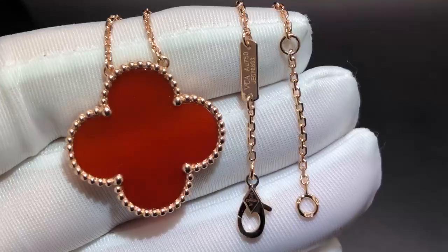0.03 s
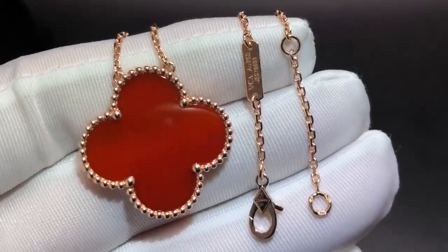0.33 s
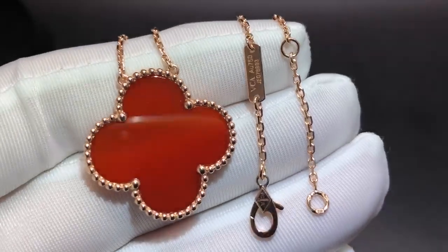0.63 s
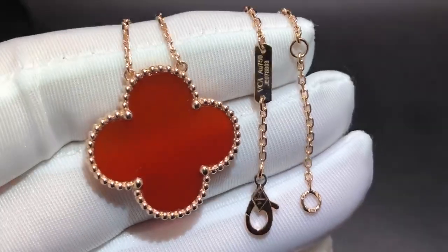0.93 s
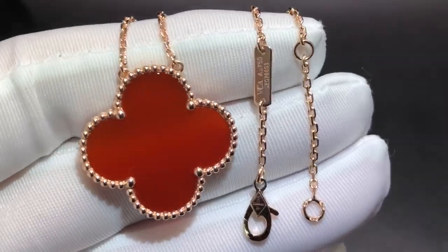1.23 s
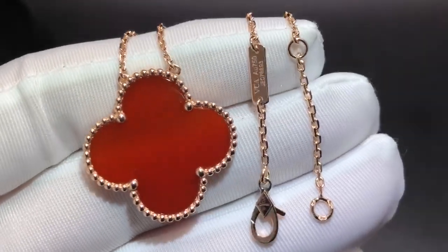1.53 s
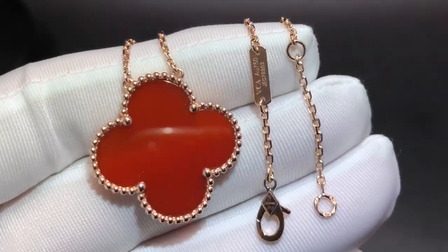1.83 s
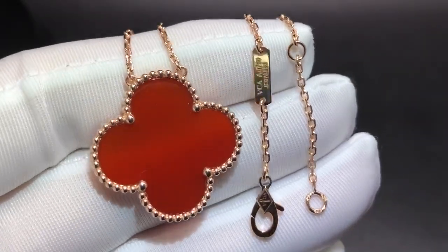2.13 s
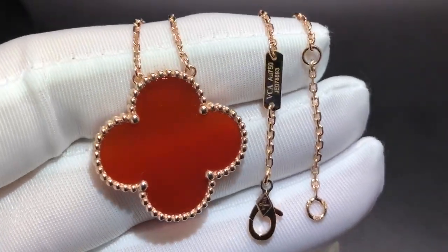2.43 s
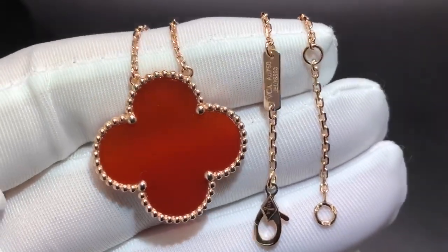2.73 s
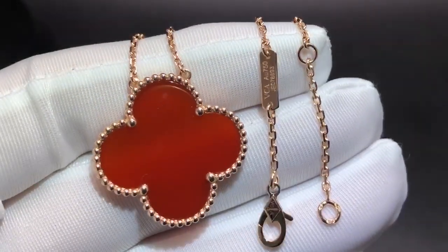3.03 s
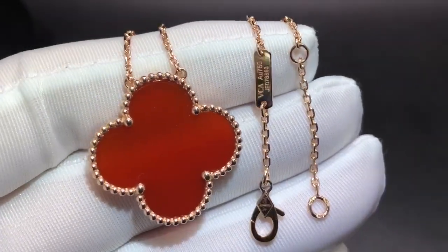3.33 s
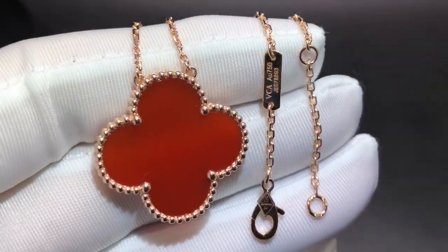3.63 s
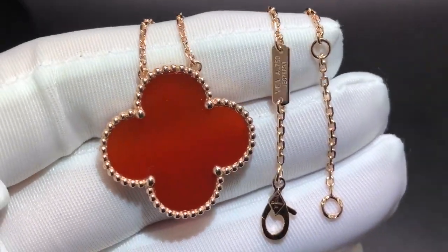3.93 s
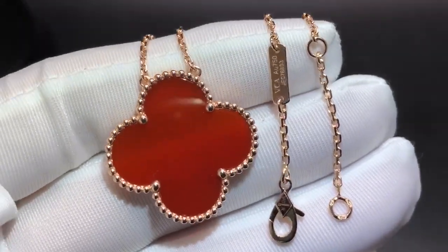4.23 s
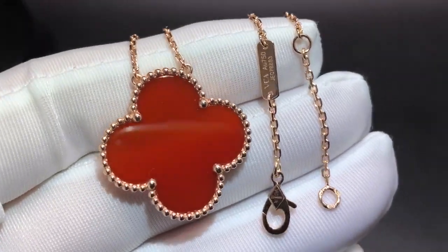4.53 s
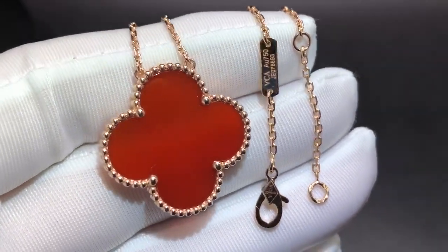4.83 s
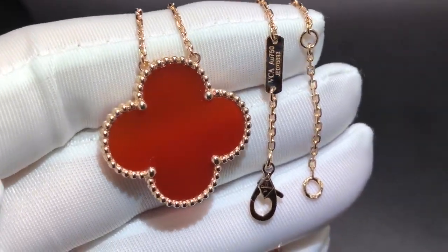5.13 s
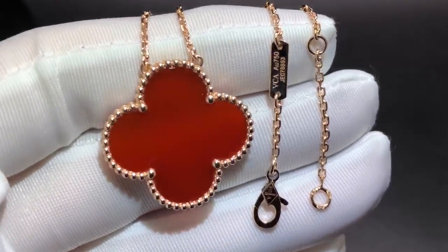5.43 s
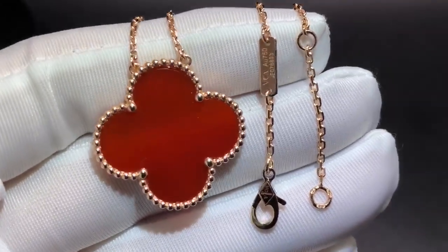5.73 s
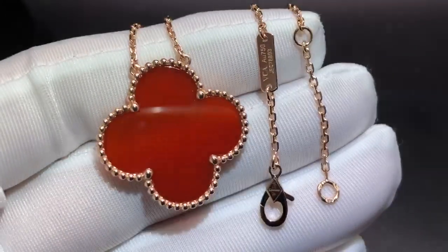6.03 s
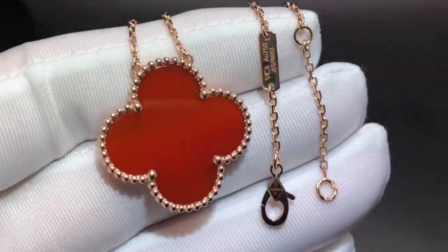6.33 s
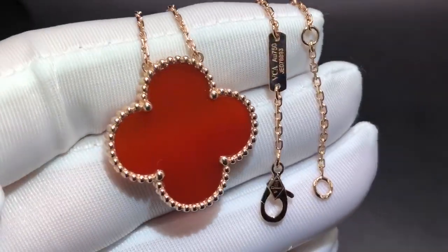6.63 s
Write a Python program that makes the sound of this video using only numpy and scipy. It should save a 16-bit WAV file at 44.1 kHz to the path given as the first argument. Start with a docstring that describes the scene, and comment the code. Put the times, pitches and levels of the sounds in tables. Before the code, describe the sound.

A low ventilation rumble with soft hiss runs throughout in a small workroom. Machines hum on steady notes, two fans beat about twice a second, and faint thin whistles come and go. From about 0.1 to 0.5 seconds there is a short, high, slightly raspy friction squeal. A small electric motor then runs up, barely audible at first, with a fine rising treble buzz and a light rush of air growing gradually. From about 3.8 seconds its high whine swells in quick, uneven throbs, strongest between 4.5 and 5.5 seconds, then easing toward the end at about 6.7 seconds while the buzz continues. Close by, a gloved hand brushes softly twice, at about 4.2 and 5 seconds. Everything is fairly quiet, with the low rumble and hum remaining the main sound.

```python
"""Small workroom. Ventilation rumbles and hisses, machines hum on steady notes, two fans beat at 2 Hz.
A gloved hand brushes softly twice, close by. After a short friction squeal a small electric motor
runs up: its slot whine swells and throbs through the casing resonance, while a fine treble buzz
and the rush of rotor air grow with speed."""
import sys
import numpy as np
from scipy import signal
from scipy.fft import rfft, irfft, next_fast_len
from scipy.io import wavfile
from scipy.ndimage import uniform_filter1d

SR = 44100
rng = np.random.default_rng(int(sys.argv[2]) if len(sys.argv) > 2 else 0)


def unload_wav(signal):
    """Save mono or channel-first audio to the path in sys.argv[1] as 16-bit WAV at rate SR, clipped to [-1, 1]."""
    wavfile.write(
        sys.argv[1],
        SR,
        np.round(np.clip(np.atleast_2d(signal).T, -1, 1) * 32767).astype(np.int16),
    )


N = 295470
TIME = np.arange(N) / SR

# ventilation rumble with room modes, air hiss, top hiss: (frequency [Hz], density [dB/Hz])
RUMBLE = [(25, -92), (38, -83), (45, -77), (58, -60), (72, -77), (83, -61.5), (95, -71.5), (120, -59),
          (135, -67), (150, -59.5), (175, -63), (220, -65.5), (300, -76), (400, -86.5), (520, -110)]
AIR_HISS = [(300, -100), (420, -83.5), (580, -84.5), (700, -86), (950, -88), (1120, -94), (1300, -93),
            (1700, -97.5), (2400, -98), (2800, -97), (3050, -102), (3800, -102), (4700, -106), (6500, -125)]
TOP_HISS = [(3500, -125), (5200, -110), (6200, -109), (6750, -105), (7300, -111), (9700, -107),
            (11200, -111), (13500, -107)]
# brief swells and lulls of the 72-136 Hz rumble: (time [s], gain [dB])
LOW_RUMBLE_LEVEL = [(.17, -2), (.42, 7.5), (1.26, -8), (1.37, 6), (1.66, 2.5), (2.22, 2.5), (2.63, 3),
                    (2.95, -3), (3.84, -2), (3.98, 4), (4.28, 4.5), (4.68, 3), (4.8, 5.5), (5.38, -2),
                    (5.8, -4), (6.26, -10), (6.51, 3)]
# slow rise and fall of the top hiss and the fans: (time [s], gain [dB])
TOP_SWELL = [(.1, -2.5), (.42, -1), (.55, 1), (2.1, -3), (6.7, -10.5)]
FAN_SWELL = [(0, 2), (.8, 7), (1.2, 2.5), (1.7, -1), (2.2, 1), (2.7, 2), (3.2, -0.5), (3.7, 0.5),
             (4.2, -1.5), (4.7, -1.5), (5.1, 0.5), (5.7, 6), (6.2, 3.5), (6.6, -1)]
# machine and fan notes: (frequency [Hz], level [dB])
HUM_NOTES = [(49, -53), (99.9, -53), (111.4, -49.5), (198, -56.5), (231.8, -49.5), (299.8, -59),
             (333.2, -59), (347.8, -59.5), (380.7, -73.5), (428.4, -64.5), (476, -74), (523.6, -82),
             (579.6, -64.5), (666.3, -70), (713.9, -72), (761.5, -73), (896.8, -65.5), (981.1, -67),
             (1000, -76), (1056, -79.5), (1094.7, -75.5), (1141, -85), (1190, -79.5), (1380.2, -76.5),
             (2379.7, -78), (2427.2, -89), (2474.8, -90), (2808, -77.5), (2855.6, -82), (3759.9, -80),
             (3807.5, -91), (4664, -88), (4711.8, -84), (6702, -87.5)]
FAN_NOTES = [(146.87, -47), (148.89, -45.5)]
# thin machine notes: (time [s], level [dB])
HIGH_WHISTLE = [(.1, -76), (1.4, -75), (2.2, -78), (2.6, -79), (4.6, -80.5), (5.4, -77.5), (5.7, -72),
                (6.0, -82)]
LOW_WHISTLE = [(1.2, -83), (1.7, -68.5), (3.2, -69), (3.6, -88), (4.4, -65.5), (6.5, -77)]
# glove strokes: (time [s], half length [s], level [dB])
BRUSHES = [(4.19, 0.095, -67), (5.05, 0.13, -65.5)]
# cloth spectrum: (frequency [Hz], relative density [dB])
CLOTH = [(1200, -8), (2500, -5), (3400, 11), (4300, 7), (5500, 2), (10000, -35)]
# friction squeal: (time [s], pitch [Hz], level [dB])
SQUEAL = [(.03, 2670, -77), (.09, 2670, -70), (.115, 2670, -63), (.205, 2700, -57), (.24, 2725, -65),
          (.28, 2755, -58.5), (.305, 2735, -65), (.425, 2720, -64.5), (.45, 2720, -79), (.7, 2720, -130)]
# rotor air at full speed: (frequency [Hz], density [dB/Hz])
ROTOR_AIR = [(300, -100), (580, -88), (700, -89), (900, -83.5), (1020, -88), (1120, -100), (1350, -95),
             (2100, -104), (3500, -104), (4600, -104), (6000, -106), (9000, -116)]
# reflections off nearby surfaces: (delay [s])
ECHOES_S = [.01039, .02218, .04162, .04651, .07525]
# buzz envelope: (frequency [Hz], level per harmonic [dB])
BUZZ = [(4500, -101), (5600, -88), (6600, -84.5), (7600, -85), (9500, -81.5), (11000, -83.5),
        (14000, -81.3)]
# strong and weak harmonic groups: (harmonic number, gain [dB])
BUZZ_GROUPS = [(20, 0), (28, 1.5), (30, -2), (33, 3), (38, 1), (43, -2), (46, 2.5), (51, -3), (55, 1.5),
               (58, -1), (61, 3), (66, -4), (72, 3), (77, -1), (82, 3), (90, -1)]
# whine surges: (time [s], level [dB], lean [-1 lower to 1 upper side tone])
THROBS = [(3.853, -69, 0), (3.931, -67.5, 0), (4.151, -65, .5), (4.258, -69, .4), (4.353, -61, .9),
          (4.441, -67, 1), (4.486, -56, .3), (4.586, -62, .4), (4.667, -55, .45), (4.776, -58, .25),
          (4.836, -56.5, .1), (4.93, -54.5, .1), (5.02, -54.5, -.25), (5.15, -55.5, 0), (5.21, -63, -.5),
          (5.305, -57, -.3), (5.352, -59, -.2), (5.433, -57, -.8), (5.526, -62, -.25), (5.581, -62, -.5),
          (5.631, -63, -.6), (5.776, -60, -.2), (5.83, -66, -.4), (5.945, -68, -.4), (6.029, -63, -.5),
          (6.158, -66.5, -.4), (6.382, -64.5, -.8), (6.512, -67, -.3), (6.66, -69, -.6)]
# casing resonances crossed by the whine's octave: (frequency [Hz])
OCTAVE_PEAKS_HZ = [4640, 5290]


def from_db(db):
    """Decibels to gain."""
    return 10 ** (np.asarray(db) / 20)


def rms_one(x):
    """Scale to unit power."""
    return x / np.sqrt(np.mean(x ** 2) + 1e-20)


def evened(x, span_s):
    """Hold unit power over span_s; faster flutter stays."""
    size = int(span_s * SR)
    return x / np.sqrt(uniform_filter1d(uniform_filter1d(x ** 2, size), size) + 1e-20)


def in_time(rows):
    """Table columns at every sample."""
    times_s, *columns = np.transpose(rows)
    return [np.interp(TIME, times_s, column) for column in columns]


def at_hz(spectrum, hz):
    """Spectrum level, interpolated over log frequency."""
    points_hz, db = np.transpose(spectrum)
    return np.interp(np.log(np.maximum(hz, 1)), np.log(points_hz), db)


def drift(rate_hz):
    """Smooth random motion, unit rms."""
    hop, settle = 40, 2000
    pole = np.exp(-2 * np.pi * hop * rate_hz / SR)
    white = rng.standard_normal(N // hop + settle + 2)
    slow = signal.lfilter([1], [1, -2 * pole, pole * pole], white)[settle:]
    return np.interp(np.arange(N) / hop, np.arange(len(slow)), rms_one(slow))


def noise(spectrum):
    """Noise of given density, rolling off above the last point."""
    size = next_fast_len(N)
    hz = np.arange(size // 2 + 1) * SR / size
    gain = from_db(at_hz(spectrum, hz)) / np.maximum(hz / spectrum[-1][0], 1) ** 2
    return irfft(rfft(rng.standard_normal(size)) * gain, size)[:N] * np.sqrt(SR / 2)


def tone(hz):
    """Unit-power sine on a pitch curve."""
    return np.sqrt(2) * np.sin(2 * np.pi * (np.cumsum(hz) / SR + rng.random()))


def ventilation(flutter_db=1.0):
    """Moving air: rumble plus fluttering hiss."""
    swell_db, = in_time(TOP_SWELL)
    hiss = noise(AIR_HISS) + from_db(swell_db) * noise(TOP_HISS)
    return noise(RUMBLE) + from_db(flutter_db * drift(20)) * hiss


def vary_low_rumble(x, band_hz=(72, 136), level_db=-44, half_s=.052):
    """The low band holds its level between brief swells and lulls."""
    band = signal.sosfiltfilt(signal.butter(3, band_hz, "band", fs=SR, output="sos"), x)
    change_db = sum(db * np.exp(-((TIME - at_s) / half_s) ** 2) for at_s, db in LOW_RUMBLE_LEVEL)
    return x - band + from_db(level_db + change_db) * evened(band, span_s=.2)


def machine_hum(waver_db=1.14, wander_share=.000502):
    """Running machines: each note wavers slightly in level and pitch."""
    return sum(from_db(db + waver_db * drift(2.9)) * tone(hz * (1 + wander_share * drift(2.74)))
               for hz, db in HUM_NOTES)


def machine_whistles(high_hz=3855, low_hz=809.4, flicker_db=2.0, jitter_hz=5):
    """Two thin, unsteady machine notes come and go."""
    high_db, = in_time(HIGH_WHISTLE)
    low_db, = in_time(LOW_WHISTLE)
    high = from_db(high_db + flicker_db * drift(5.6)) * tone(high_hz + jitter_hz * drift(28))
    return high + from_db(low_db) * tone(low_hz + drift(2.6))


def fans(trim_db=-4.0, waver_db=1.06, wander_hz=.7, first_beat_s=.22):
    """Two close fan notes beat; they waver apart in level and wander together in pitch."""
    swell_db, = in_time(FAN_SWELL)
    wander_cycles = np.cumsum(wander_hz * drift(1.82)) / SR + rng.random()
    notes = 0
    for hz, db in FAN_NOTES:
        cycles = hz * (TIME - first_beat_s) + wander_cycles
        notes += from_db(db + waver_db * drift(9.9)) * np.sin(2 * np.pi * cycles)
    return np.sqrt(2) * from_db(swell_db + trim_db) * notes


def glove(grain_db=1.4):
    """Cloth slides on cloth in short, soft strokes."""
    strokes = sum(from_db(db) * np.exp(-((TIME - at_s) / half_s) ** 2) for at_s, half_s, db in BRUSHES)
    return strokes * from_db(grain_db * drift(60)) * rms_one(noise(CLOTH))


def squeal(noise_share=.5, rasp_hz=90):
    """Friction excites a narrow resonance: a tone inside rasping noise."""
    hz, db = in_time(SQUEAL)
    rasp = drift(rasp_hz) + 1j * drift(rasp_hz)
    envelope = np.sqrt(2 * (1 - noise_share)) + np.sqrt(noise_share) * rasp
    carrier = np.exp(2j * np.pi * np.cumsum(hz) / SR)
    return from_db(db) * evened(np.real(envelope * carrier), span_s=.03)


def rotor_rush(speed, growth=3.5, full_speed=.93):
    """Air stirred by the rotor grows steeply with speed, then levels off."""
    return np.minimum(speed / full_speed, 1) ** growth * noise(ROTOR_AIR)


def echoed(x, echo_db=-9):
    """Reflections reinforce and cancel a gliding tone in turn."""
    return x + from_db(echo_db) * sum(np.interp(TIME - delay_s, TIME, x, left=0) for delay_s in ECHOES_S)


def motor_buzz(drive_hz, speed, growth=2.2, full_speed=.94, flicker_db=2.6, jitter_hz=7):
    """High drive harmonics climb and flicker, growing until near top speed."""
    buzz = 0
    for harmonic in range(20, 96):
        hz = harmonic * drive_hz
        db = at_hz(BUZZ, hz) + np.interp(harmonic, *np.transpose(BUZZ_GROUPS))
        buzz += from_db(db + flicker_db * drift(10)) * tone(hz + jitter_hz * drift(29))
    return buzz * np.minimum(speed / full_speed, 1) ** growth


def casing_gain(hz, centre_hz, width_hz):
    """Response of one casing resonance, peak 1."""
    return 1 / np.sqrt(1 + (2 * (hz - centre_hz) / width_hz) ** 2)


def throbs(side, half_s=.029, focus_db=12):
    """Surge envelope of one whine tone, strongest when the throb leans its way."""
    return sum(from_db(db - focus_db * (side - lean) ** 2) * np.exp(-((TIME - at_s) / half_s) ** 2)
               for at_s, db, lean in THROBS)


def slot_whine(slot_hz, speed, growth=3.0, jitter_hz=9):
    """Slot tone, side tones at twice mains frequency either way, and octave ring in the casing."""
    whine_db, flutter_db = -62.5, 2.0
    side_hz, side_loss_db = 100, 3.5
    octave_db, octave_flutter_db = -75.5, 3.5
    strength = speed ** growth
    octave_gain = sum(casing_gain(2 * slot_hz, hz, width_hz=200) for hz in OCTAVE_PEAKS_HZ)
    octave = octave_gain * tone(2 * (slot_hz + jitter_hz * drift(60)))
    whine = 0
    for side in (-1, 0, 1):
        hz = slot_hz + side * side_hz
        ringing = casing_gain(hz, centre_hz=2700, width_hz=180)
        steady = strength * ringing * from_db(whine_db - side_loss_db * abs(side))
        level = np.hypot(steady, throbs(side)) * from_db(flutter_db * drift(33))
        whine += level * tone(hz + jitter_hz * drift(57.8))
    return whine + strength * from_db(octave_db + octave_flutter_db * drift(18)) * octave


def motor(start_hz=35.3, top_hz=260.034, run_up_s=8.178, whine_harmonic=12):
    """Run-up: acceleration falls linearly toward zero at top speed."""
    drive_hz = top_hz - (top_hz - start_hz) * (1 - TIME / run_up_s) ** 2
    speed = drive_hz / top_hz
    whine = slot_whine(whine_harmonic * drive_hz, speed)
    return whine + echoed(motor_buzz(drive_hz, speed)) + rotor_rush(speed)


def scene():
    """Mono sum of room tone, motor, squeal and glove."""
    room_tone = vary_low_rumble(ventilation() + machine_hum()) + fans() + machine_whistles()
    return (room_tone + motor() + squeal() + glove())[None]


def record(dry):
    """Brief silence, 1 ms fade-in, steep low-pass."""
    start_s, cutoff_hz = .035, 14150
    fade_in = np.clip((TIME - start_s) / .001, 0, 1)
    return signal.sosfilt(signal.ellip(12, .1, 80, cutoff_hz, fs=SR, output="sos"), dry * fade_in)


dry = scene()
out = record(dry)
unload_wav(out)
```